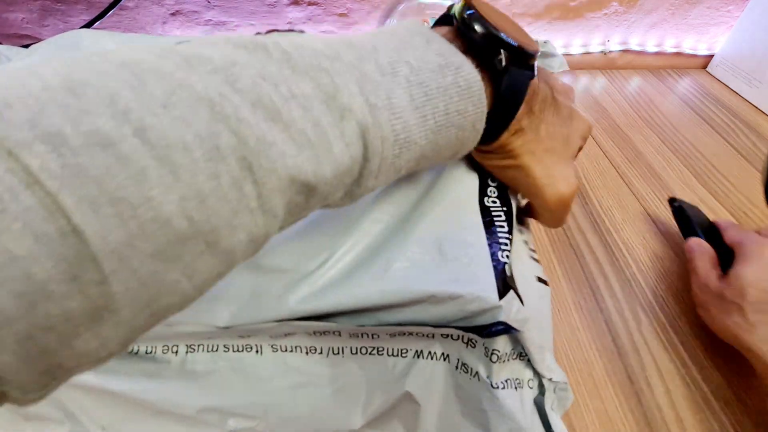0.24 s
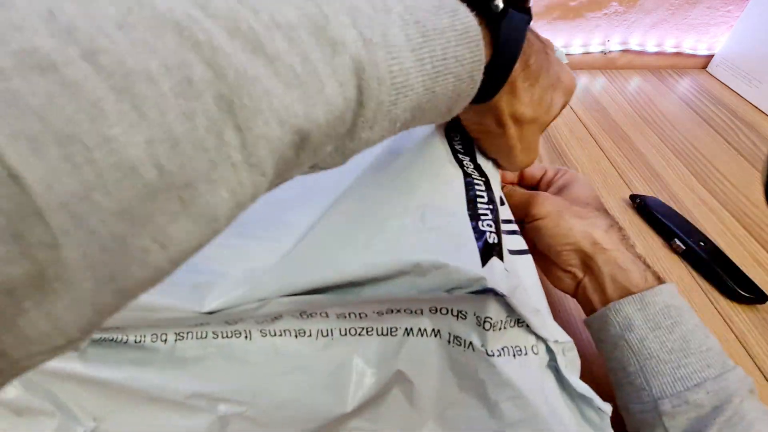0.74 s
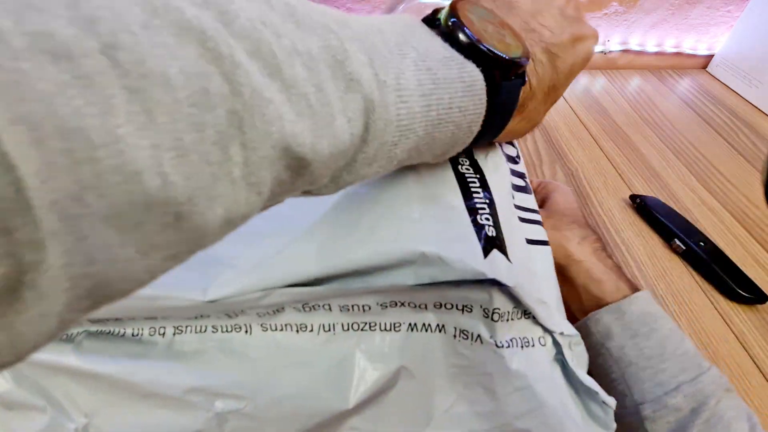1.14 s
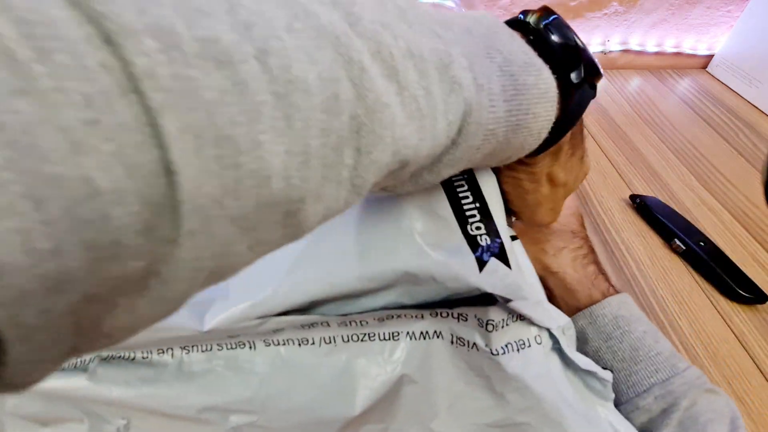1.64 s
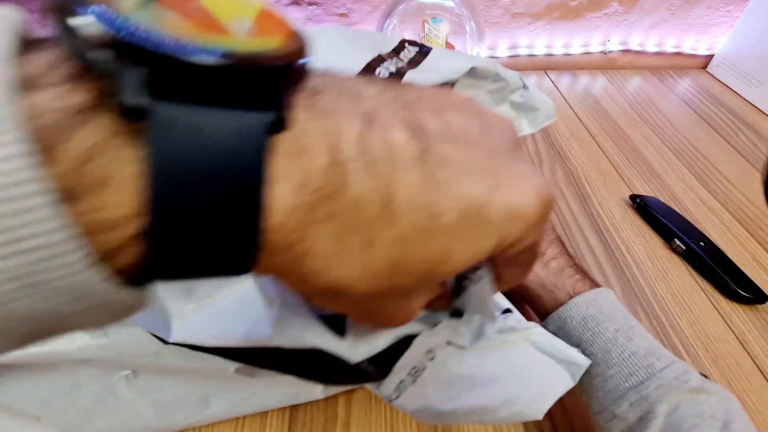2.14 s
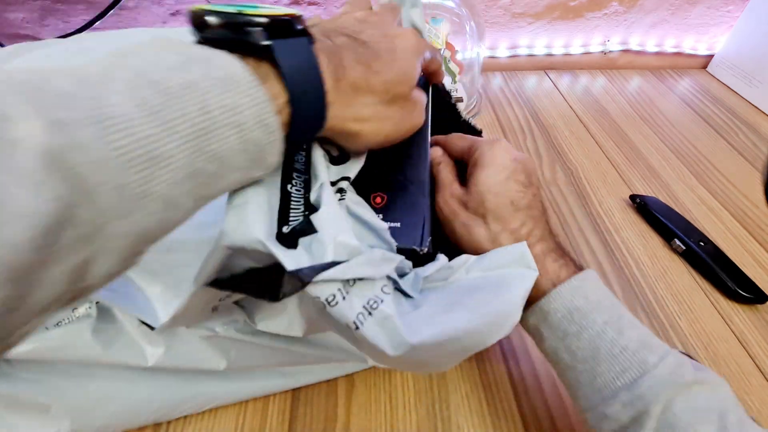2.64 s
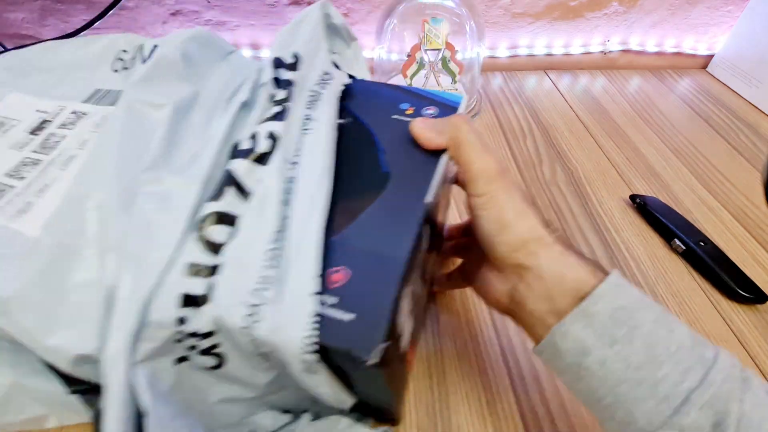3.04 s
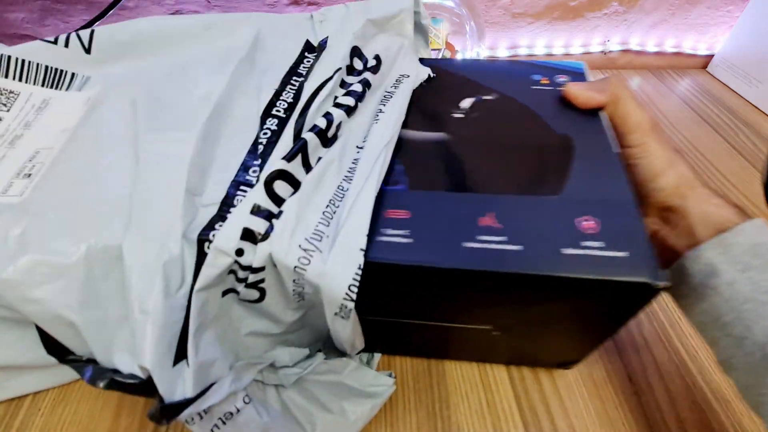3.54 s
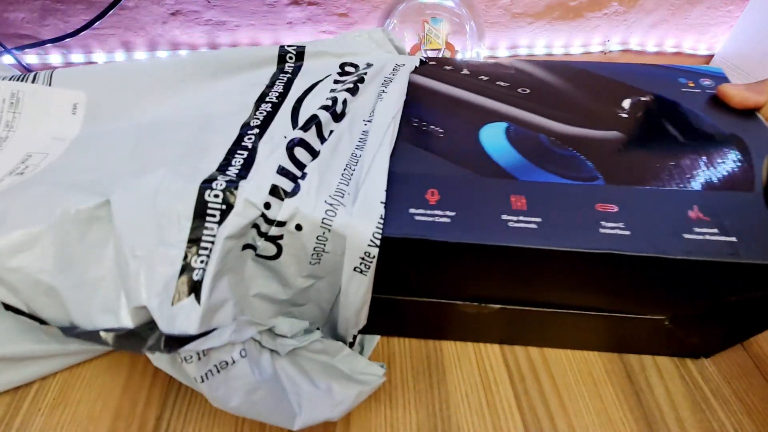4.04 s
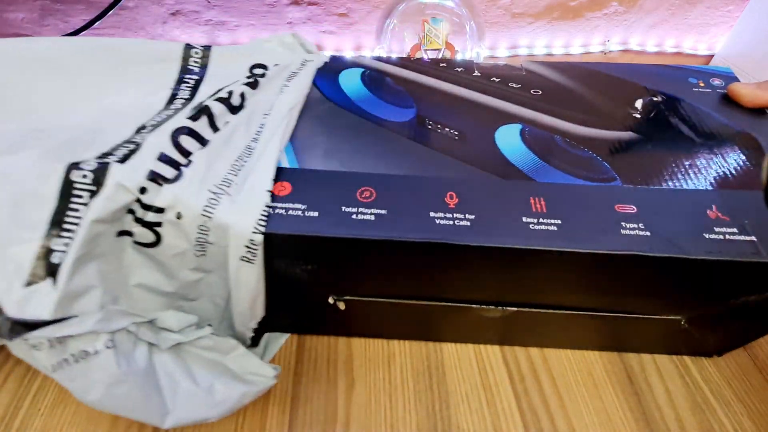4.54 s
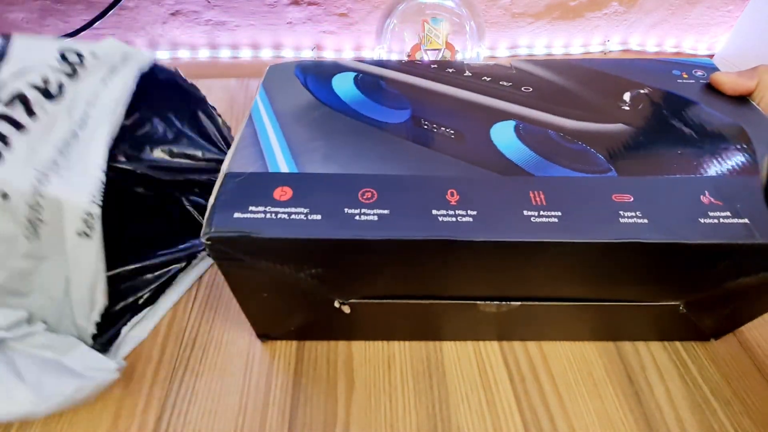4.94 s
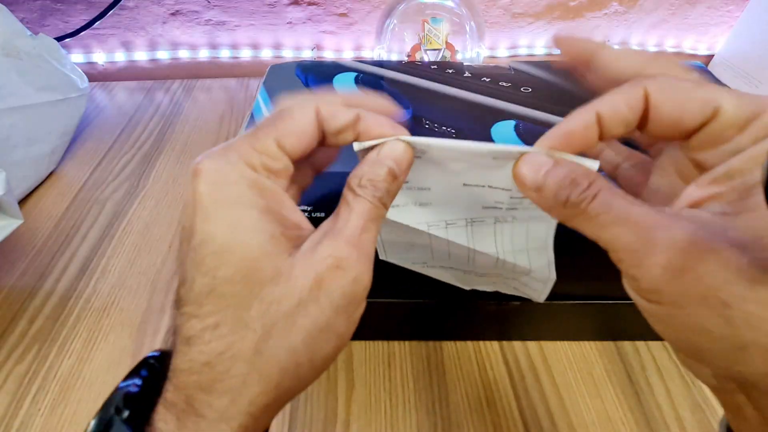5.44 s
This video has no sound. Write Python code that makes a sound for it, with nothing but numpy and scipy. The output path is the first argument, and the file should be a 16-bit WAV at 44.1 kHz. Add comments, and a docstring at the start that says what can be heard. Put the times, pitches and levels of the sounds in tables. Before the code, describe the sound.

Close stereo recording at a wooden desk in a small room. A cutter blade clicks shut and the cutter knocks down on the wood. Hands grip a plastic bag, crinkling it in bursts with sharp snaps, then tear it wider. A cardboard box is pulled out with hissing film and dull bumps. Finally a small paper slip snaps and rustles over a low room rumble.

```python
"""Opening a plastic mailer bag

A plastic bag is pulled open on a wooden desk, a cardboard box is drawn out, and a paper slip is unfolded. The
film is made of countless tiny decaying tones, with a few loud snaps and a hiss where the box slides. A cutter
clicks shut and is put down, and the box bumps the desk: short tones and noise that die away. Decaying noise
gives the reflections of a small room, over a low rumble and a faint room tone."""
import sys
import numpy as np
from scipy import signal
from scipy.fft import rfft, irfft, next_fast_len
from scipy.io import wavfile
from scipy.ndimage import map_coordinates

SR = 44100
rng = np.random.default_rng(int(sys.argv[2]) if len(sys.argv) > 2 else 0)


def store_wav(level_fs):
    """Save 16-bit WAV to argv[1]."""
    pcm = np.round(np.clip(np.atleast_2d(level_fs), -1, 1) * 32767)
    wavfile.write(sys.argv[1], SR, pcm.T.astype(np.int16))


N = 250488

# In all tables a left_right_db above 0 is louder on the left, and a t60_s is the time to fade by 60 dB.
# How fast the film folds: time_s, creases_per_s
FOLDING_RATE = [(0, 350), (1.0, 400), (1.3, 700), (1.5, 400), (2.2, 900), (2.8, 700), (3.3, 2200),
                (3.9, 1100), (4.3, 2400), (5.0, 1600), (5.3, 400)]
# Loud buckles of film and paper: start_s, level_db (before the room, energy as if spread over 4 ms),
# pitch_hz (of the facet), crack_db (bright crack over the pitched body), left_right_db
SNAPS = [(0.225, -35.5, 1800, -28, -4.5), (0.347, -31.5, 2420, -5, -4), (0.3862, -33.5, 1320, -2, -6),
         (0.4903, -36.5, 4020, 0, -3), (0.7108, -30.5, 1640, -18, -5.5), (0.7548, -36.5, 4300, -21, -6),
         (0.7828, -35.5, 1590, -19, 1), (0.887, -37, 6310, -2, 1), (0.9803, -32, 3450, -18, 4),
         (1.1012, -30, 3670, -4, 3), (1.1309, -33, 1250, -25, -15.5), (1.1772, -34, 1230, -14, -9),
         (1.1931, -26.5, 1330, -11, -8), (1.2315, -33, 1320, -1, -11), (1.2527, -15.5, 1490, -13.5, -4.5),
         (1.2677, -25, 1060, -1, -1), (1.309, -27, 1940, -4, -2), (1.5914, -32.5, 1690, -4.5, -5.5),
         (1.6243, -33.5, 4620, 0, -6), (1.6649, -33, 980, -7, -8), (1.694, -26.5, 4000, 7, -7),
         (1.755, -27, 2550, -8, -3), (1.7908, -15.5, 1440, -5, -1.5), (1.7968, -28, 1900, 1, 0),
         (2.0623, -29, 1430, -14, 1), (2.077, -35, 2700, -2, -2), (2.1535, -30, 6650, 6, -6),
         (2.16, -32, 7000, 0, 0), (2.1765, -24, 2160, -18, -2), (2.3334, -31, 1590, -19, 5),
         (2.3725, -32, 5060, -22, -2), (2.4152, -41, 755, -28, 10), (2.5655, -34.5, 2640, 2, 1),
         (2.71, -32, 2280, -3, 0), (2.968, -32, 2870, -2, 5), (3.1459, -31, 1490, -20, 3),
         (3.171, -29.5, 1530, -5, 9), (3.253, -25, 6190, 4, 4), (3.7165, -29.5, 1340, -16, 8),
         (3.963, -27, 1450, -27, -2), (4.0153, -29, 1396, -17, 2), (4.5588, -26, 1780, -27, -6.5),
         (5.2836, -19.5, 1560, -14, 2), (5.3251, -29, 2070, -13, 3), (5.3334, -31.5, 2280, -16, -1),
         (5.3822, -40.5, 1150, -24, 0), (5.464, -30.5, 1860, -3, 0), (5.4964, -28.5, 1900, 1.5, 0),
         (5.5603, -32.5, 1550, -18, 2), (5.5913, -31, 850, -20, 5), (5.594, -31, 1830, -22, -1),
         (5.613, -26.5, 1710, -30, 4.5), (5.622, -38, 1400, -30, 10), (5.6585, -19.5, 1520, -7.5, 3)]
# The cutter's blade clicks back: start_s, level_db
BLADE_CLICKS = [(0.069, -28.5), (0.0905, -19.5)]
# The cutter lands on the desk and settles: start_s, peak_db (before the room), upper_edge_hz (higher is harder)
CUTTER_KNOCKS = [(0.41, -7.5, 2640), (0.4129, -19, 2800), (0.4167, -12.5, 736), (0.4236, -20.5, 2200),
                 (0.468, -30, 696), (0.53, -32, 600)]
# Low thuds of the desk under cutter, hands and box: start_s, level_db, pitch_hz
DESK_THUDS = [(0.414, -26, 239), (1.924, -27.5, 64), (1.928, -30, 156), (2.55, -34.5, 123), (2.87, -39, 55),
              (3.571, -36, 74.5)]
# The cardboard box bumps the desk: start_s, level_db
BOX_BUMPS = [(2.603, -30.5), (3.25, -27), (3.615, -22.5), (3.966, -29), (4.558, -28.5), (4.621, -38),
             (5.172, -37)]
# Tones of the struck desk top: pitch_hz, relative level_db, t60_s
DESK_TONES = [(207, -7, 0.13), (258, -3, 0.17), (410, -8, 0.16), (560, 4.5, 0.05), (740, -2, 0.074),
              (1090, -3, 0.075), (1235, 6.5, 0.05), (1640, 7.5, 0.032), (2120, 6, 0.019), (2530, -14, .03)]
# Tones of the bumped box: pitch_hz, relative level_db, t60_s
BOX_TONES = [(259, -1.5, 0.038), (393, 4, 0.042), (540, 5, 0.034), (726, -11, 0.13), (1170, -32, 0.015)]

# Tone colour of crinkling film: frequency_hz, relative level_db (per Hz)
CRINKLE_COLOUR = [(300, -15), (700, -4.5), (1300, -0.5), (2400, -1.5), (4000, -5), (6500, -6.5),
                  (8500, -18), (16000, -44)]
# Tone colour of flapping film, also of the puff under the box: frequency_hz, relative level_db (per Hz)
FLAP_COLOUR = [(90, -11), (200, -7), (400, 0), (700, -1.5), (1200, -8.5), (3000, -50)]
# Tone colour of film sliding along the box: frequency_hz, relative level_db (per Hz)
HISS_COLOUR = [(1000, -42), (3000, -2.5), (5000, -2.5), (6800, -2), (8000, -7.5), (9800, -9.5),
               (11500, -6.5), (15500, -11)]
# Tone colour of air pushed by the bulging bag: frequency_hz, relative level_db (per Hz)
BULGE_COLOUR = [(20, -12), (60, 0.5), (130, -1), (200, -3.5), (400, -16.5), (1500, -72)]
# Tone colour of the paper slip: frequency_hz, relative level_db (per Hz)
PAPER_COLOUR = [(150, -5.5), (400, -3.5), (750, 1.5), (1700, 1), (3500, -4), (6500, -4.5), (9000, -14.5),
                (16000, -20)]
# Tone colour of a snap: frequency_hz, relative level_db
SNAP_COLOUR = [(150, -19), (400, 5), (2500, -1), (6500, 2.5), (8500, -4.5), (16000, -7)]
# Tone colour of the faint background room tone, strongest in the bass: frequency_hz, relative level_db (per Hz)
ROOM_TONE_COLOUR = [(12, -53), (20, -4), (74, -1), (123, -6), (146, -8.5), (172, -19), (542, -29),
                    (759, -14), (1330, -27), (3630, -36), (6720, -54), (9400, -63), (16000, -73)]
# Tone colour of the room's rumble: frequency_hz, relative level_db (per Hz)
RUMBLE_COLOUR = [(15, -23), (30, -7), (50, -1), (75, -3.5), (130, -6.5), (200, -14.5), (400, -23.5), (1500, -96.5)]

# How alike left and right are: frequency_hz, likeness (1 is the same, 0 unrelated, below 0 opposed)
LIKENESS = [(60, 0.83), (150, 0.91), (290, 0.65), (640, -0.38), (1400, -0.26), (3000, -0.00041),
            (15000, -0.022)]
# Where bag and slip are heard: time_s, left_right_db
HANDS_PAN = [(0, -2.5), (1.2, -2), (1.8, -1.5), (2.3, 0), (3.2, 1.3), (4.2, 0.5), (5.1, 0.7), (5.6, 0.5)]
# How long the room's tail lasts: frequency_hz, t60_s
ROOM_FADE = [(150, 0.5), (500, 0.29), (2000, 0.23), (6000, 0.16), (15000, 0.16)]

# The hands grip and crumple the bag: start_s, length_s, crinkle_db, flap_db (over crinkle), hiss_db (over crinkle)
CRUMPLES = [(0, 0.0042, -48.5, -5, -5), (0.23, 0.029, -40, -8, -22.0), (0.308, 0.092, -33, -14, -12.5),
            (0.458, 0.011, -37.5, 0.5, -9), (0.572, 0.171, -39.5, -3.5, 0), (0.622, 0.011, -31, -6.5, -12),
            (0.83, 0.061, -42.5, -5.5, -3.5), (0.956, 0.15, -37.5, -7.5, -5.5),
            (1.146, 0.053, -31, -9, -7.5), (1.26, 0.047, -27, -6.5, -9), (1.387, 0.005, -36, -7.5, -6),
            (1.494, 0.104, -44, 2, -3.5), (1.644, 0.017, -35.5, -7.5, -13),
            (1.715, 0.015, -27.5, -12, -5.5), (1.786, 0.021, -23.5, -7.0, -7.5),
            (1.854, 0.18, -34, -9, -5.5), (2.06, 0.042, -33, -9.5, -5), (2.164, 0.16, -29.5, -12, -5.5),
            (2.39, 0.13, -39, -8.0, -3.5), (2.554, 0.11, -37, -7.5, -2), (2.707, 0.019, -32.5, -6.5, -9.5),
            (2.783, 0.15, -40.5, -10, -3), (2.963, 0.14, -34.5, -10.0, -4), (3.135, 0.038, -33, -6, -10),
            (3.218, 0.17, -32.5, -9.5, -13), (3.708, 0.031, -33, -5.5, -3.5), (3.963, 0.13, -37.5, -5, -8),
            (4.43, 0.091, -44.5, -12, -1.5), (4.819, 0.024, -45, -8, -13), (4.919, 0.054, -43.5, -11, -5.5),
            (5.022, 0.0083, -38.5, -6.5, -7.5)]
# The box is drawn out in pulls: start_s, length_s, hiss_db, crinkle_db (over hiss)
PULLS = [(3.244, 0.429, -34, -0.5), (3.77, 0.29, -41.5, 3), (4.215, 0.2, -38, 0), (4.565, 0.072, -35.5, 1),
         (4.743, 0.053, -34.5, -3)]
# The fingers unfold the paper slip: start_s, length_s, rustle_db
UNFOLDS = [(5.171, 0.35, -58.5), (5.27, 0.047, -38.5), (5.325, 0.014, -33.5), (5.463, 0.0086, -33),
           (5.493, 0.0058, -33), (5.554, .12, -35)]

# Attack and release times are for 20 dB.
CRUMPLE_ATTACK_S, CRUMPLE_RELEASE_S = 0.063, 0.066
CRUMPLE_SAG_DB_PER_S = 12.5  # the grip eases while held
PULL_ATTACK_S, PULL_RELEASE_S = 0.071, 0.063
PULL_FLAP_DB = -9.5  # flapping over crinkle
PULL_SLACKEN_DB_PER_S = 8.5  # crinkle and flapping fade as the film slackens
UNFOLD_ATTACK_S, UNFOLD_RELEASE_S = 0.021, 0.055
HELD_FROM_S, HELD_UNTIL_S = 0.18, 5.04  # the bag is in the hands
HELD_CRINKLE_DB, HELD_FLAP_DB, HELD_HISS_DB = -50.5, -57, -60.5  # between moves
BULGE_DB = -18.5  # over the crinkle
CLICK_HZ, CLICK_RING_DB, CLICK_T60_S = 4120, -28, 0.045  # the ring of the blade
RUMBLE_DB, RUMBLE_SAG_DB_PER_S, RUMBLE_SWING_DB = -49.5, 0.5, 1.4  # it eases slowly and wavers
TOP_HZ = 16000  # highest crease pitch, and the top of the whole sound


def amp(db):
    """Turn decibels into gain."""
    return 10 ** (np.asarray(db) / 20)


def unit(x):
    """Scale a sound to an rms of 1."""
    return x / np.sqrt(np.mean(x ** 2) + 1e-20)


def decay(t, t60):
    """Gain that falls by 60 dB in t60 seconds."""
    return amp(-60 * t / t60)


def rise(t, rise_s):
    """Soft start: gain that climbs from 0 towards 1."""
    return 1 - np.exp(-t / rise_s)


def noise(count=N):
    """Unrelated white noise for left and right."""
    return rng.standard_normal((2, count))


def along(points, hz):
    """Read a curve of (frequency, value) points on a logarithmic frequency axis."""
    f, v = np.transpose(points)
    return np.interp(np.log(hz + 1), np.log(f + 1), v)


def curve(rows):
    """Join (time, value) points into one value per sample."""
    s, values = np.transpose(rows)
    return np.interp(np.arange(N) / SR, s, values)


def wobble(rate):
    """Smooth random curve through a given number of random points a second."""
    points = rng.standard_normal(int(N * rate / SR) + 4)
    return map_coordinates(points, [np.arange(N) * rate / SR])


def colour(x, gain, size=16384):
    """Shape the frequencies of a sound with a filter that never answers ahead of time."""
    wanted = np.maximum(gain(np.fft.rfftfreq(size, 1 / SR)), 1e-6)
    # folding the cepstrum forward gives the minimum-phase filter
    cepstrum = irfft(np.log(wanted))
    cepstrum[1:size // 2] *= 2
    cepstrum[size // 2 + 1:] = 0
    answer = irfft(np.exp(rfft(cepstrum)))[:size // 2]
    if x.ndim > 1:
        answer = answer[None]
    return signal.fftconvolve(x, answer, axes=-1)[..., :x.shape[-1]]


def stereo(pair, spectrum):
    """Colour two unrelated signals and mix them into a left and right that are alike in the bass."""
    alike = lambda hz: np.clip(along(LIKENESS, hz), -.98, .98)
    mid = colour(pair[0], lambda hz: amp(along(spectrum, hz)) * np.sqrt(1 + alike(hz)))
    side = colour(pair[1], lambda hz: amp(along(spectrum, hz)) * np.sqrt(1 - alike(hz)))
    return unit(np.array([mid + side, mid - side]))


def panned(db):
    """Left and right gains that differ by db, the left louder when db is positive."""
    return amp(np.array([db, -db]).reshape(2, -1) / 2)


def add(track, s, sound):
    """Mix a sound into the track at time s."""
    part = track[:, max(round(s * SR), 0):][:, :sound.shape[-1]]
    part += sound[..., :part.shape[1]]


def move(s, length_s, attack_s, release_s, sag_db_per_s=0):
    """Gain of one movement: it swells up to time s, holds while it sags, and dies away."""
    t = np.arange(N) / SR - s
    steps_of_20_db = np.maximum(-t / attack_s, (t - length_s) / release_s).clip(0, 10)
    sag_db = sag_db_per_s * t.clip(0, abs(length_s))
    return amp(-20 * steps_of_20_db - sag_db)


def room(x, wet_db, early_db, early_t60=0.038):
    """Add to a sound its quick reflections off desk and wall, and the room's tail, both decaying noise."""
    hz, t, z = signal.stft(noise(SR // 3), SR, nperseg=256)
    fading = z * decay(t, along(ROOM_FADE, hz)[:, None])
    tail = signal.istft(fading, SR, nperseg=256)[1]
    t = np.arange(tail.shape[1]) / SR
    early = noise(len(t)) * decay(t, early_t60) * (t > .001)
    answer = amp(wet_db) * tail / np.linalg.norm(tail[0])
    answer = answer + amp(early_db) * early / np.linalg.norm(early[0])
    return x + signal.fftconvolve(x, answer, axes=1)[:, :x.shape[1]]


def scatter(x, t60):
    """Diffuse reflections: noise that holds the power of x and lets it die away."""
    keep = amp(-120 / (t60 * SR))
    power = signal.lfilter([1 - keep], [1, -keep], x ** 2)
    return np.sqrt(power) * rng.standard_normal(x.shape)


def ringing(tones, t):
    """Dying tones of a struck body, each with its own phase left and right, more alike in the bass."""
    out = 0
    for hz, db, t60 in tones:
        level = amp(db + rng.normal(0, 1)) * decay(t, t60)
        phase_turns = min(hz / 1400, .5) * rng.normal(0, 0.37, (2, 1))
        out = out + level * np.sin(2 * np.pi * (hz * t + phase_turns))
    return out


def background():
    """Low rumble of the room, with a faint room tone, both made from coloured noise."""
    sag_db = RUMBLE_SAG_DB_PER_S * np.arange(N) / SR
    rumble_db = RUMBLE_DB - sag_db + RUMBLE_SWING_DB * wobble(3.12)
    rumble = amp(rumble_db) * panned(-1.6) * stereo(noise(), RUMBLE_COLOUR)
    return rumble + amp(-56.0) * stereo(noise(), ROOM_TONE_COLOUR)


def desk_thuds():
    """Soft drops make the desk thud: low sine tones that die away."""
    out, t = np.zeros((2, N)), np.arange(SR // 3) / SR
    for s, db, hz in DESK_THUDS:
        thud = -np.sin(2 * np.pi * hz * t) * decay(t, 0.11) * rise(t, 0.00066)
        add(out, s, amp(db) * thud)
    return out


def box_bumps():
    """The box bumps the desk: its cardboard tones ring briefly over a puff of noise."""
    out, t = np.zeros((2, N)), np.arange(SR // 3) / SR
    for s, db in BOX_BUMPS:
        puff = colour(noise(len(t)), lambda hz: amp(along(FLAP_COLOUR, hz))) * decay(t, 0.047)
        bump = (0.65 * ringing(BOX_TONES, t) + 3.8 * puff) * rise(t, 0.00078)
        add(out, s, amp(db) * room(bump, wet_db=-10.5, early_db=-18))
    return out


def cutter_knocks():
    """The cutter sets the desk top ringing with a burst of noise; harder knocks keep more treble."""
    out, t = np.zeros((2, N)), np.arange(SR // 3) / SR
    for s, db, edge_hz in CUTTER_KNOCKS:
        blow = ringing(DESK_TONES, t) + 14 * noise(len(t)) * decay(t, 0.015)
        # keep what lies between 150 Hz and the upper edge
        knock = colour(blow, lambda hz: (hz / np.hypot(hz, 150)) ** 2 / np.hypot(1, (hz / edge_hz) ** 5))
        add(out, s, amp(db) * room(knock / np.abs(knock).max(), wet_db=-13, early_db=-8))
    return out


def cutter_clicks():
    """The slider of the cutter clicks and rings briefly, off to the right: two tones and some noise."""
    out, t = np.zeros((2, N)), np.arange(SR // 4) / SR
    for s, db in BLADE_CLICKS:
        tone = np.sin(2 * np.pi * CLICK_HZ * t)
        upper_tone = np.sin(2 * np.pi * 6200 * t)
        tick = (tone + 0.57 * upper_tone + 0.15 * rng.standard_normal(len(t))) * decay(t, 0.003)
        ring = tone * amp(CLICK_RING_DB) * decay(t, CLICK_T60_S)
        click = (tick + ring) * rise(t, 0.00019)
        add(out, s, amp(db) * room(panned(-6.5) * click, wet_db=-7, early_db=-5.5))
    return out


def creases(pitch_hz, spread, cycles, size_db, rub, share=1, near=0.87, far=0.74):
    """Tiny buckles, each a few cycles of its own pitch, over the noise of film rubbing on film."""
    # count creases as time passes, then pick random places along that count
    passed = np.cumsum(np.maximum(share * curve(FOLDING_RATE), 10)) / SR
    count = int(passed[-1])
    chance = rng.random((count, 5))
    start = np.searchsorted(passed, chance[:, 0] * count)
    hz = np.minimum(pitch_hz * np.exp(spread * (2 * chance[:, 1:2] - 1)), TOP_HZ)
    # many small creases, few big ones
    bigness = np.minimum(-np.log(1 - chance[:, 2:3]), 3)
    size = amp(size_db * bigness) * np.sqrt(hz)

    t = np.arange(SR // 200) / SR
    where = (start[:, None] + np.arange(len(t))).ravel()
    fade = size * np.exp(-t * hz / cycles)
    sides = []
    for turn in chance[:, 3:].T:  # a random phase for each side
        buckles = fade * np.sin(2 * np.pi * (hz * t + turn[:, None]))
        sides.append(np.bincount(where, buckles.ravel(), N)[:N])
    pair = unit(np.array(sides))

    haze = near * scatter(pair, t60=0.052) + far * scatter(pair, t60=0.26) + rub * noise()
    # low creases crowd a narrow band and need a stronger haze
    return pair + haze * (SR / 2 / pitch_hz) ** 0.37


def slip():
    """Thin paper rustles between the fingers: creases of widely spread pitch."""
    power = 0
    for s, length_s, db in UNFOLDS:
        power = power + (amp(db) * move(s, length_s, UNFOLD_ATTACK_S, UNFOLD_RELEASE_S)) ** 2
    rustle = creases(pitch_hz=3000, spread=2.23, cycles=.9, size_db=4.0, rub=0.42)
    return np.sqrt(power) * stereo(rustle, PAPER_COLOUR)


def snaps():
    """A taut facet flips over: a pulse that reaches one side first sets off its pitch, with a ragged crack."""
    out, t = np.zeros((2, N)), np.arange(SR // 5) / SR
    for s, db, facet_hz, crack_db, pan_db in SNAPS:
        lag_s = rng.uniform(.0001, 0.000379) * rng.permutation([0, 1])[:, None]
        ragged = lambda: noise(len(t)) * decay(t, 0.0065) * rise(t, 0.00025)
        tint = lambda hz: amp(along(SNAP_COLOUR, hz))
        # a resonance around the facet's pitch
        facet = lambda hz: tint(hz) / np.hypot(1, 2.9 * (hz / facet_hz - facet_hz / (hz + 1)))
        pulse = np.sinc((t - lag_s) * SR)
        body = unit(colour(pulse + 0.22 * ragged(), facet))
        crack = unit(colour(ragged(), lambda hz: tint(hz) * hz / np.hypot(hz, 5000)))
        flip = body + amp(crack_db) * crack
        flip /= np.linalg.norm(flip, axis=1, keepdims=True)
        strength = amp(db) * np.sqrt(.004 * SR)  # the energy of 4 ms at this level
        add(out, s, strength * panned(pan_db) * room(flip, wet_db=-13.0, early_db=-6))
    return out


def handling():
    """Gains of crinkle, flapping and hiss: holding, crumpling and pulling add up in power."""
    held = move(HELD_FROM_S, HELD_UNTIL_S - HELD_FROM_S, CRUMPLE_ATTACK_S, CRUMPLE_RELEASE_S)
    power = np.outer(amp([HELD_CRINKLE_DB, HELD_FLAP_DB, HELD_HISS_DB]), held) ** 2
    for s, length_s, db, flap_db, hiss_db in CRUMPLES:
        grip = move(s, length_s, CRUMPLE_ATTACK_S, CRUMPLE_RELEASE_S, CRUMPLE_SAG_DB_PER_S)
        power += np.outer(amp([db, db + flap_db, db + hiss_db]), grip) ** 2
    for s, length_s, db, crinkle_db in PULLS:
        slide = move(s, length_s, PULL_ATTACK_S, PULL_RELEASE_S)
        drag = amp(crinkle_db) * move(s, length_s, PULL_ATTACK_S, PULL_RELEASE_S, PULL_SLACKEN_DB_PER_S)
        power += (amp(db) * np.array([drag, amp(PULL_FLAP_DB) * drag, slide])) ** 2
    return np.sqrt(power)


def bag():
    """The film crinkles in fits, its slack parts flap, it hisses along the box, and its bulging pushes air."""
    crinkle_gain, flap_gain, hiss_gain = handling()
    # slow folding comes in clumps
    fits_db = 1.5 * wobble(70) * np.sqrt(500 / np.maximum(curve(FOLDING_RATE), 100))

    fine = creases(pitch_hz=2360, spread=1.225, cycles=1.03, size_db=2.5, rub=0.65)
    # a few larger folds tick on their own, each at its own pitch
    ticks = creases(pitch_hz=2600, spread=1, cycles=2.8, size_db=2.5, rub=0, share=.07, near=.45, far=.4)
    crinkle = crinkle_gain * stereo(unit(fine) + .5 * unit(ticks), CRINKLE_COLOUR)

    flapping = creases(pitch_hz=600, spread=0.86, cycles=0.83, size_db=5.5, rub=1.26)
    flap = flap_gain * stereo(flapping, FLAP_COLOUR)

    sizzle = creases(pitch_hz=8000, spread=.6, cycles=1.2, size_db=3, rub=0, share=.1, near=.4, far=.3)
    sliding = creases(pitch_hz=7500, spread=0.9, cycles=0.62, size_db=0.5, rub=0.82)
    hiss = hiss_gain * stereo(unit(sliding) + .45 * unit(sizzle), HISS_COLOUR)

    bulge = amp(BULGE_DB) * crinkle_gain * stereo(noise(), BULGE_COLOUR)
    return amp(fits_db - 1) * (crinkle + flap + hiss) + bulge


def scene():
    """All layers together; bag and slip drift from a little right to a little left."""
    hands = panned(curve(HANDS_PAN)) * (bag() + slip())
    desk = cutter_knocks() + box_bumps() + desk_thuds()
    return hands + snaps() + cutter_clicks() + desk + background()


def record(dry):
    """Remove everything from the band limit upwards."""
    m = next_fast_len(N + SR // 4)
    kept = np.fft.rfftfreq(m, 1 / SR) < TOP_HZ
    return irfft(rfft(dry, m) * kept, m)[:, :N]


dry = scene()
out = record(dry)
store_wav(out)
```